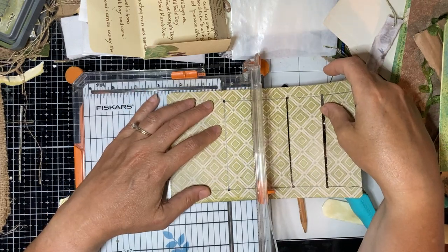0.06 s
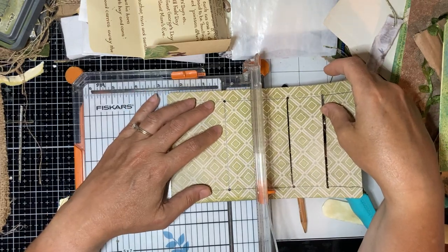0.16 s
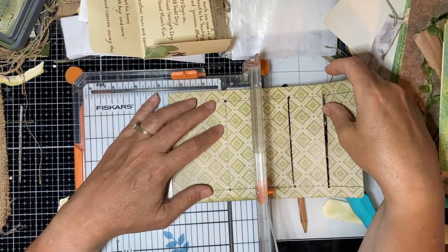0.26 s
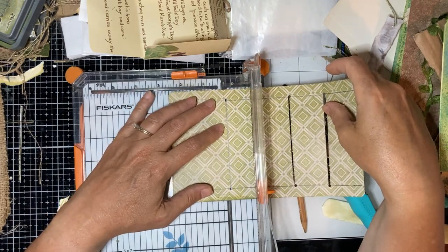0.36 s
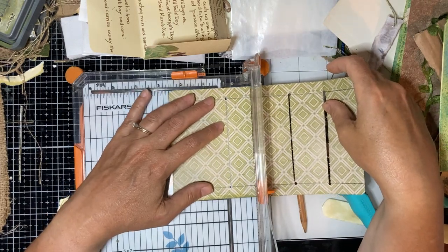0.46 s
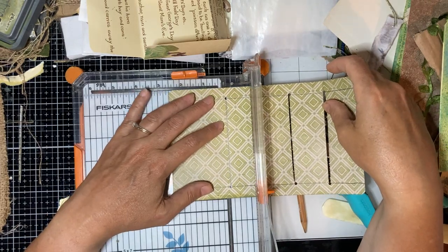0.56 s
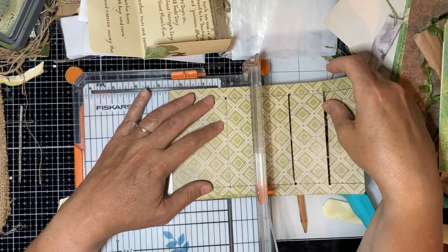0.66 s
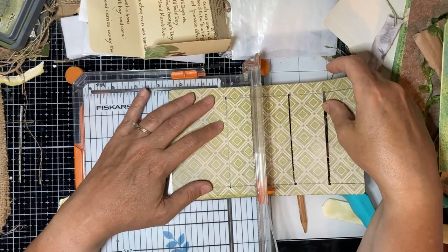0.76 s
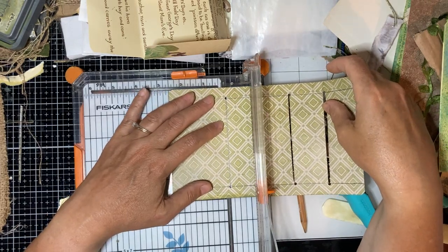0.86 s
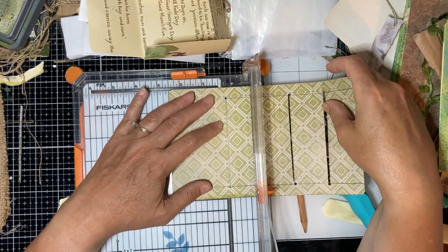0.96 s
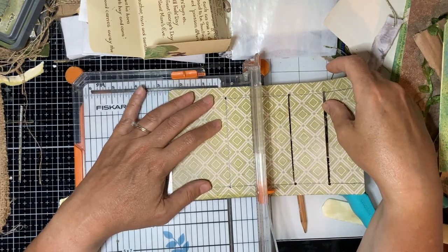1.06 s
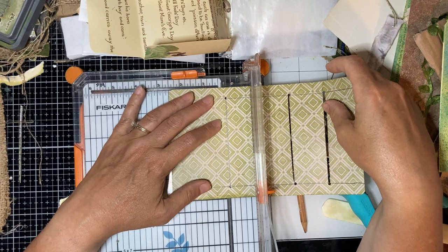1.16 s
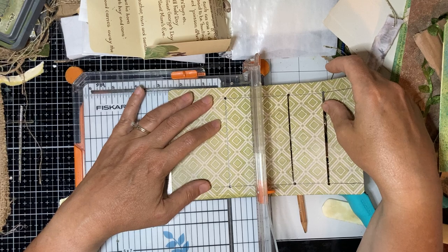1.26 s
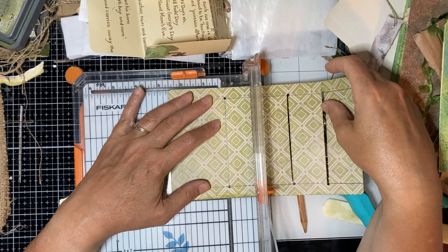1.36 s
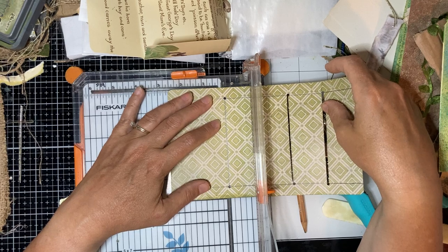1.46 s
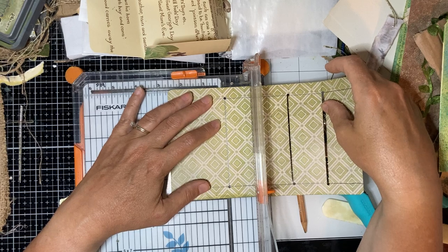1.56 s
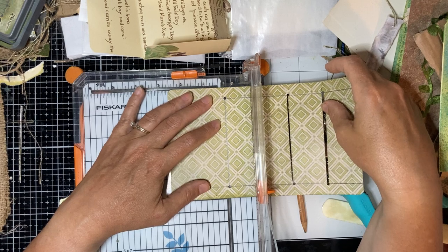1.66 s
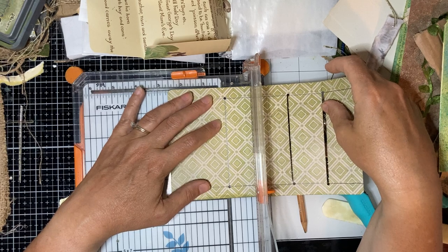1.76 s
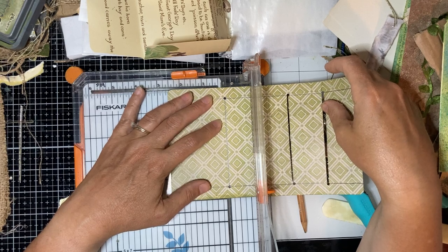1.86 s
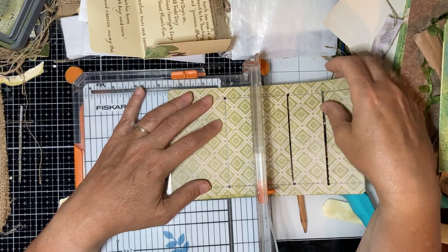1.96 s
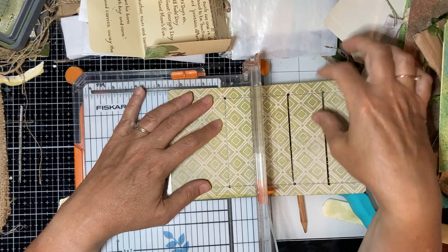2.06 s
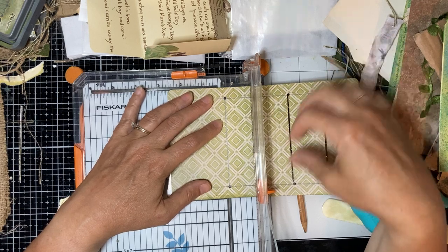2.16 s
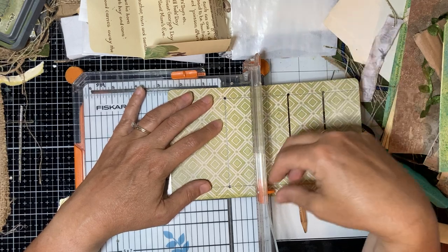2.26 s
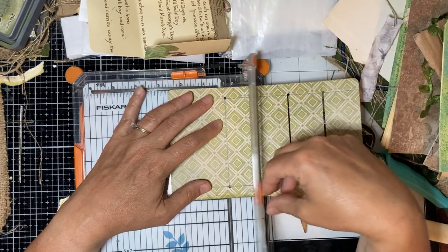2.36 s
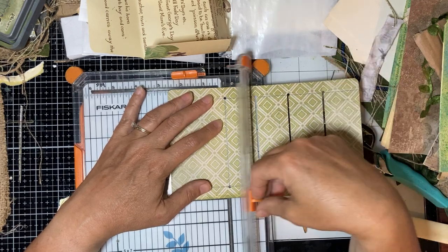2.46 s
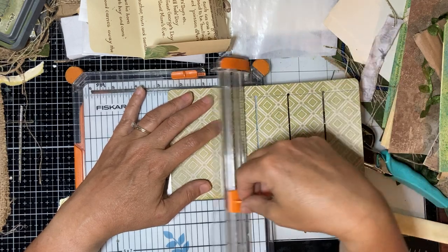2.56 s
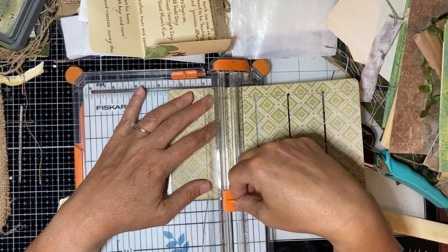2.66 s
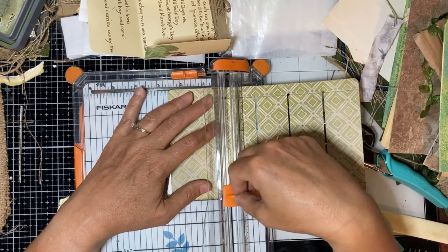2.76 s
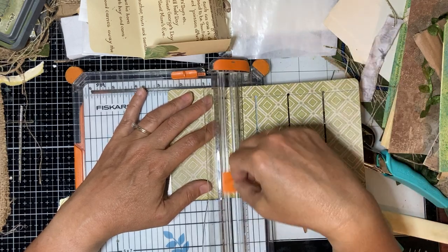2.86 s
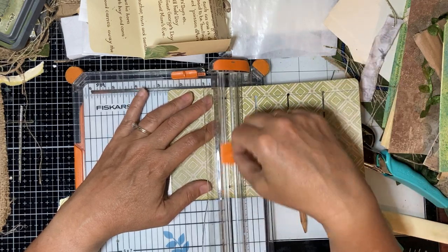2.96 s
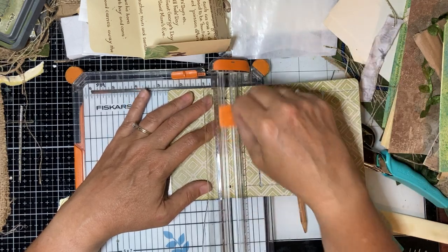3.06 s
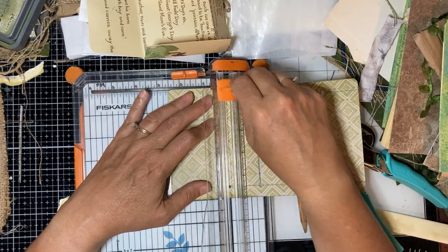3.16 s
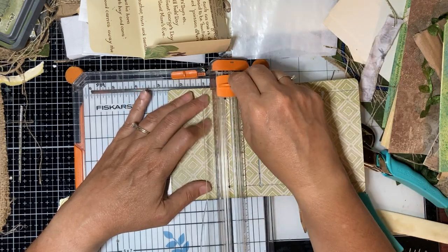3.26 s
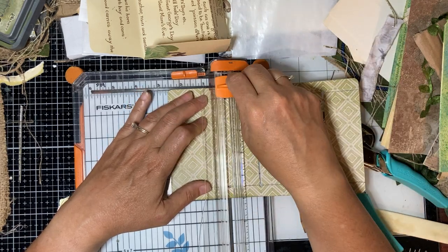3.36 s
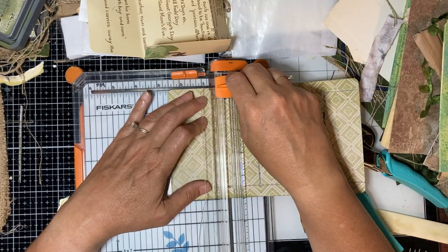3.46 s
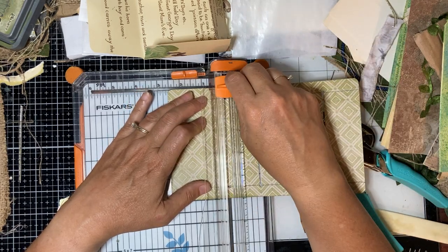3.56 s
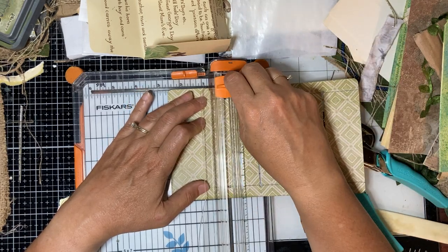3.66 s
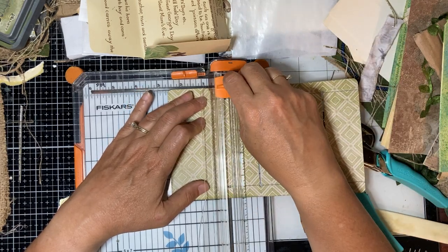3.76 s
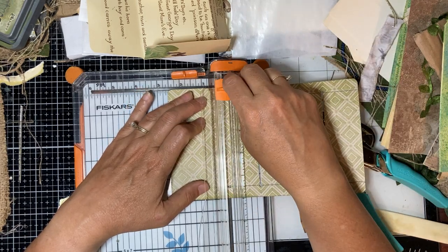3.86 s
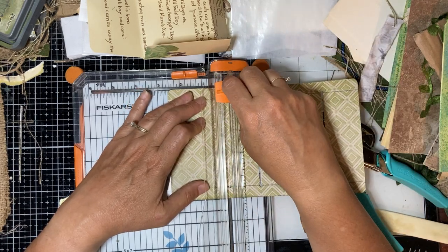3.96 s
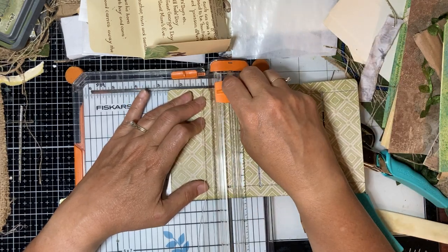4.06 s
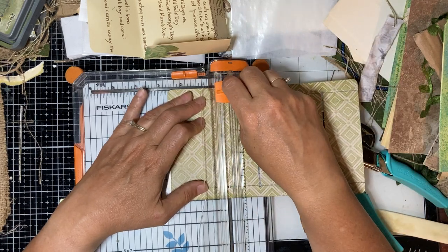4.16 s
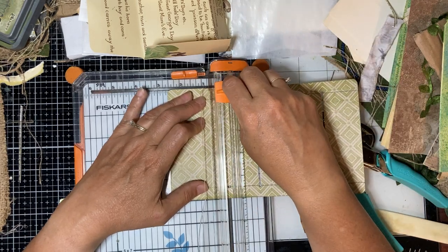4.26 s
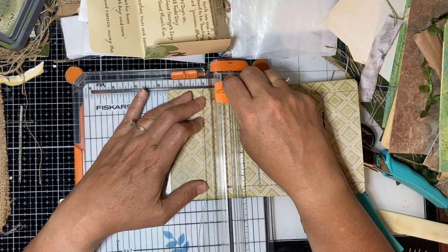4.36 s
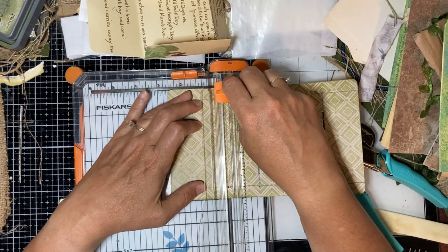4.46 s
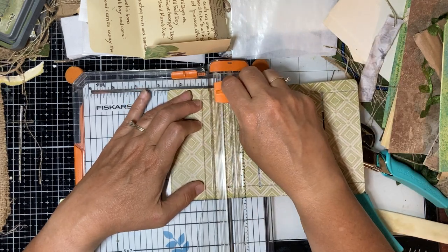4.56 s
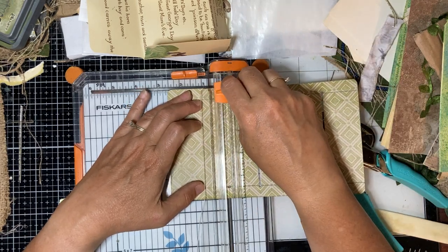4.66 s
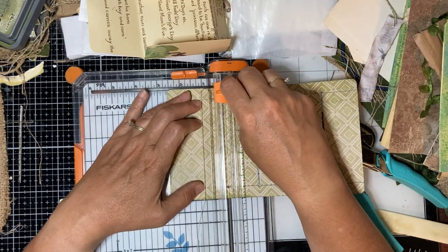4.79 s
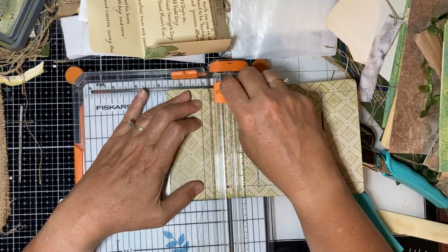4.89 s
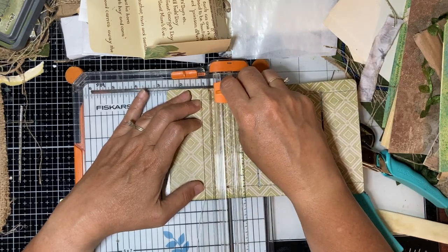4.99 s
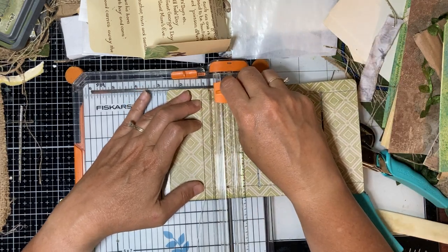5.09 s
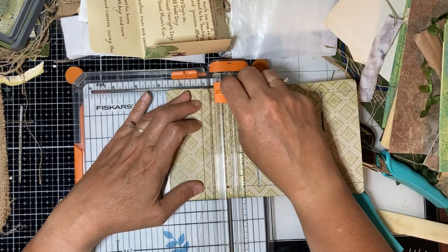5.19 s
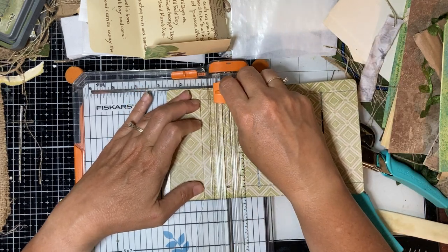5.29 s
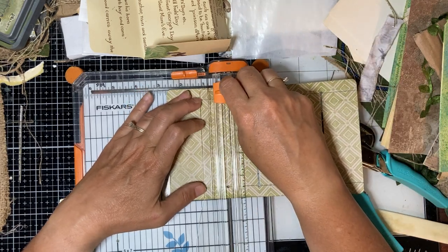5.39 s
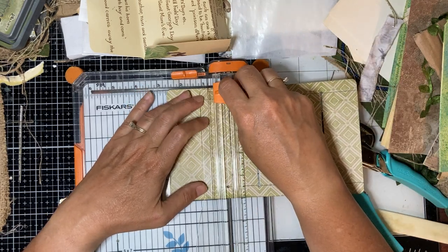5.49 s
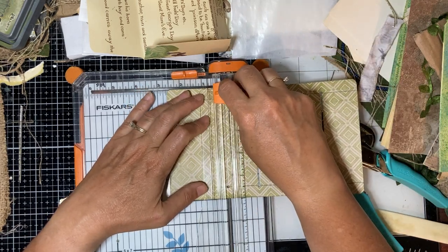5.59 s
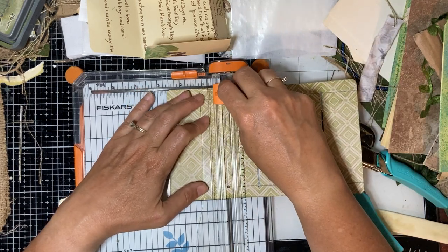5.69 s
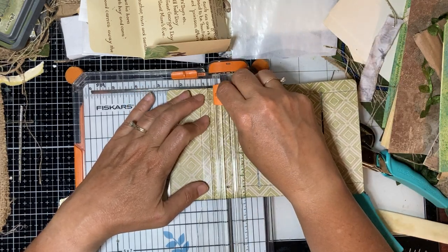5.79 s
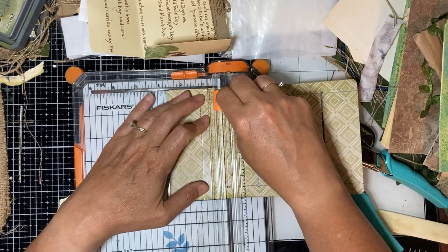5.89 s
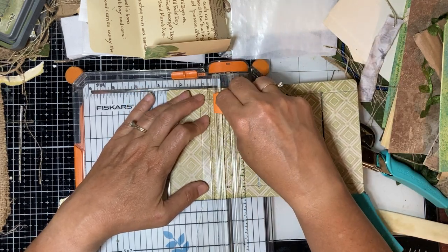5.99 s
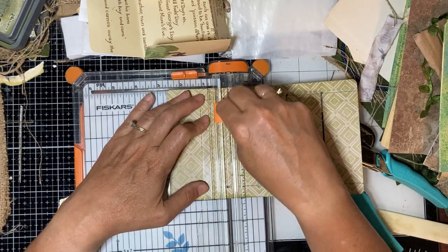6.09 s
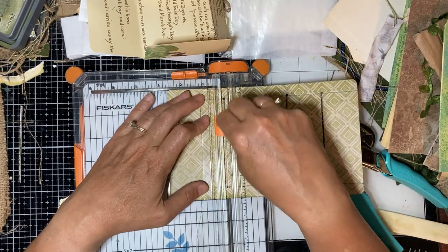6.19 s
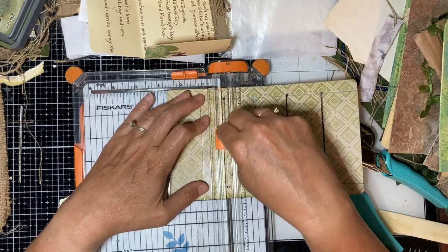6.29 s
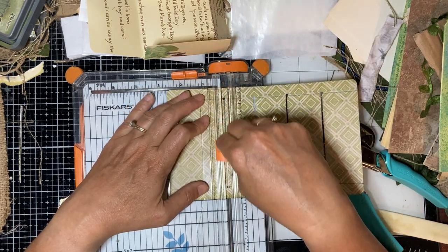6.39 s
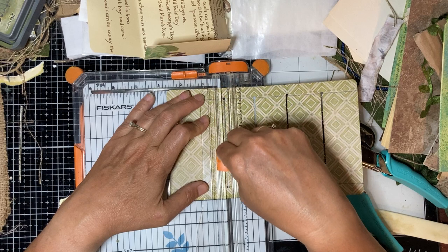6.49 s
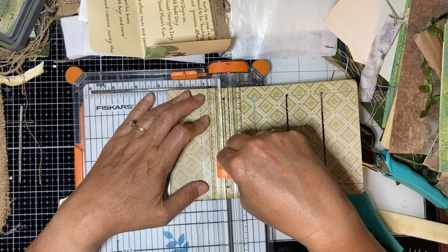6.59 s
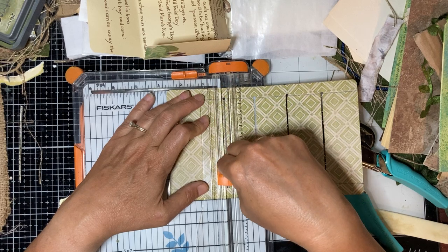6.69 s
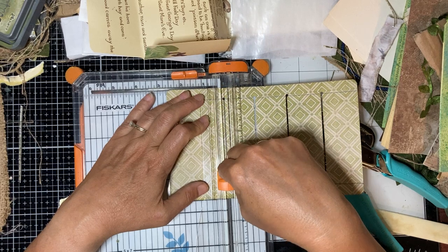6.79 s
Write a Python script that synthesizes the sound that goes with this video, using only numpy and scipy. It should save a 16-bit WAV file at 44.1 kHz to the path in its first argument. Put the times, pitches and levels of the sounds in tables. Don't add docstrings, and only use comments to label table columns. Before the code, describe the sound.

A quiet indoor desk, miked closely in stereo with a slight left lean, over low appliance hum and a faint distant motor during the first 1.5 s. From 0.4 to 1.6 s come tiny card scuffs, faint breathy skin whistles and soft taps, clearest near 0.9. Around 2.0 a short hard rub and double tap as card shifts. Hand shuffling and small clicks run 2.3-2.55, then a loud, bright plastic double clack at 2.65. From 2.85 the carriage slides, squealing in high stick-slip bursts, strongest about 3.0, with gliding wire notes, bumping to its stop near 3.3. Sparse soft taps and scuffs fill 3.6-5.4, notably 3.9, 4.4 and 5.2. Clicks and rubbing at 5.5-5.85 end in a low knock at 5.87. From 6.0 a coarse hollow scrape cuts the card, strongest near 6.25, breaking into quick snags from 6.4, easing toward a final thump at 6.79.

```python
import sys
import numpy as np
from scipy import signal
from scipy.fft import rfft, irfft, next_fast_len
from scipy.io import wavfile
from scipy.ndimage import uniform_filter1d, map_coordinates

SR = 44100
rng = np.random.default_rng(int(sys.argv[2]) if len(sys.argv) > 2 else 0)


def magnitude_from_level(level_db):
    exponent = np.asarray(level_db, float) / 20
    return 10 ** exponent


def output_pcm(signal):
    pcm = np.clip(np.atleast_2d(signal).T, -1, 1) * 32767
    wavfile.write(sys.argv[1], SR, np.round(pcm).astype(np.int16))


N = 301644
TIME = np.arange(N) / SR


def unit(x):
    return x / np.sqrt(np.mean(x ** 2) + 1e-20)


def unit_gain(response):
    return response / np.sqrt(np.mean(np.abs(response) ** 2))


def along(points, hz):
    f, v = np.transpose(points)
    return np.interp(np.log(hz + 1), np.log(f + 1), v)


def wobble(rate):
    knots = rng.standard_normal(int(N * rate / SR) + 4)
    return map_coordinates(knots, [TIME * rate])


def gate(start, length, rise, fall):
    return np.clip(np.minimum((TIME - start) / rise, (start + length - TIME) / fall + 1), 0, 1)


def filtered(x, response):
    m = next_fast_len(N + SR // 2)
    return irfft(rfft(x, m) * response(np.fft.rfftfreq(m, 1 / SR)), m)[..., :N]


def modes(table):
    def response(f):
        total = 0
        for k, (centre, width, db) in enumerate(table):
            damping = 1j * f * width
            total = total + (-1) ** k * magnitude_from_level(db) * damping / (centre * centre - f * f + damping)
        return unit_gain(total)
    return response


def colour(points):
    return lambda f: unit_gain(magnitude_from_level(along(points, f)))


# f/Hz, lead/rad
LEFT_LEAD = [(0, 0), (700, .9), (1550, -.2), (2840, 2.2), (5900, 2.6), (6800, .1), (9200, -3.14),
             (11200, -6.1), (12400, -7.7), (13400, -9.2), (16000, -12.8)]


def ports(pair, alike):
    def spread(hz):
        turn = np.arccos(np.clip(along(alike, hz), 0, 1)) / 2
        return np.array([np.cos(turn), np.sin(turn)])

    def lag(hz):
        return np.exp(np.outer([.5j, -.5j], np.interp(hz, *np.transpose(LEFT_LEAD))))

    mid, side = filtered(pair, spread)
    return filtered(np.array([mid + side, mid - side]), lag)


# f/Hz, level/dB
AIR = [(25, -40.5), (45, -3.5), (60, -0.5), (80, -7.5), (110, -10.5), (170, -14.5), (260, -25), (500, -37),
       (1000, -41.5), (2000, -47), (5000, -50), (10000, -54.5), (13000, -54.5), (15600, -70)]
# f/Hz, unsteadiness/Hz, level/dB
HUM = [(58.5, 4.045, -55.5), (103.2, 2.8, -63), (118.3, 6.9, -68.5), (241.2, 1.7, -76.5)]
# t/s, f/Hz, level/dB
DRONE = [(0, 331.3, -76.5), (.25, 336.5, -70.5), (.45, 330, -78), (.65, 332, -71.5), (.85, 337, -70),
         (1.1, 334.5, -72.5), (1.3, 328, -81.5), (1.5, 328, -99)]
# f/Hz, likeness/0..1
FAR_ALIKE = [(100, 0.93), (350, 0.68), (700, 0.38), (1500, 0.097), (6000, 0.1), (7200, 0.21), (8600, 1),
             (11400, 0.71), (13000, 0.69), (15500, 0.506)]


def room():
    air = magnitude_from_level(-57.5 + 0.4 * wobble(1.7)) * filtered(rng.standard_normal((2, N)), colour(AIR))
    hum = np.zeros(N)
    for hz, rate, db in HUM:
        level = np.sqrt(2) * magnitude_from_level(db + 2.88 * wobble(rate))
        hum += level * np.sin(2 * np.pi * hz * TIME + 1.2 * wobble(rate))
    s, hz, db = np.transpose(DRONE)
    phase = 2 * np.pi * np.cumsum(np.interp(TIME, s, hz)) / SR + 1.6 * wobble(18)
    drone = magnitude_from_level(np.interp(TIME, s, db) + 3.3 * wobble(8)) * np.sin(phase)
    return ports(air + hum * [[1], [.3]] + drone * [[1], [.5]], FAR_ALIKE)


# f/Hz, t60/s
WALLS = [(200, 0.29), (2000, 0.1), (10000, 0.11)]


def walls(x):
    hz, t, z = signal.stft(rng.standard_normal((2, SR // 2)), SR, nperseg=256)
    decay = magnitude_from_level(-60 * t / along(WALLS, hz)[:, None])
    tail = signal.istft(z * decay, SR, nperseg=256)[1]
    tail = tail / np.linalg.norm(tail[0])
    late = np.pad(x, (200, 0))
    return signal.fftconvolve(late[None], tail, axes=1)[:, :N]


# t/s, f/Hz, level/dB, t60/s
RINGS = [(3.165, 7200, -45, .03), (2.637, 1500, -44, 0.056), (2.654, 1455, -45, 0.056),
         (3.915, 900, -68.5, 0.052), (5.23, 800, -52, 0.045), (2.636, 736, -49, 0.048),
         (2.768, 1070, -57.5, 0.038), (2.873, 1220, -54, 0.037), (3.144, 1730, -41, 0.03),
         (3.316, 2240, -44.5, 0.03), (3.333, 618, -49, 0.055), (3.262, 2100, -62.5, .1),
         (5.262, 780, -62, 0.053), (2.65, 823, -46, 0.051), (.428, 687, -67, 0.054),
         (.553, 703, -66, 0.081), (.89, 700, -57, 0.058), (1.013, 1190, -67, 0.048),
         (1.99, 840, -52.5, 0.032), (2.026, 950, -54, 0.027), (2.346, 1085, -51, 0.05),
         (2.51, 2100, -52, 0.1), (2.511, 2820, -43.5, 0.06), (2.522, 1090, -62, 0.035),
         (2.652, 4110, -33, 0.079), (2.7, 4020, -60, 0.095), (5.779, 4130, -51, .04),
         (5.868, 3370, -54, .04), (5.87, 1510, -43, 0.039), (0.064, 1260, -68, 0.054),
         (.905, 668, -59, 0.085), (1.036, 1910, -60.5, 0.042), (1.56, 980, -65, 0.044),
         (1.701, 980, -70, 0.07), (1.995, 1770, -41, 0.031), (2.014, 1786, -39, 0.03),
         (2.0, 293, -57.5, 0.15), (2.638, 1048, -41, 0.078), (2.636, 125, -36, 0.072),
         (2.667, 109, -39, 0.063), (3.12, 198, -46, 0.091), (3.341, 196, -50, 0.092),
         (5.229, 468, -48, 0.076), (5.29, 190, -46.5, 0.17), (5.686, 3620, -49, 0.027),
         (5.705, 3610, -48, .025), (5.72, 3620, -48, 0.027), (5.872, 327, -37.5, 0.07),
         (5.873, 145, -37, 0.075), (6.787, 109, -33, 0.037),
         (2.652, 7000, -37, .025), (2.668, 8100, -43, .025), (2.668, 10300, -50, .02),
         (2.702, 8050, -44, .03), (2.702, 10200, -45, 0.022), (2.516, 7900, -47, .025),
         (2.516, 10200, -46, .02), (2.535, 7900, -55, .03), (3.258, 620, -54, 0.047),
         (5.605, 700, -65, .09), (5.29, 450, -50.5, .07), (5.292, 790, -53, 0.055), (4.42, 900, -56, .06),
         (2.955, 2850, -55, 0.059)]


def thumps():
    out, t = np.zeros(N + SR), np.arange(SR // 2) / SR
    for s, hz, db, t60 in RINGS:
        ring = magnitude_from_level(db - 60 * t / t60) * np.sin(2 * np.pi * hz * t)
        out[round(s * SR):][:len(t)] += ring * (1 - np.exp(-t / 0.001))
    return out[:N]


# t/s, length/s, level/dB
CHIRPS = [(0.463, 0.028, -74), (0.598, 0.022, -70), (0.832, 0.03, -73), (.941, 0.017, -68.5),
          (.97, 0.029, -79), (2.366, 0.056, -84), (3.841, 0.061, -88)]
# f/Hz, width/Hz, level/dB
SKIN = [(7540, 660, -0.5), (9300, 620, -1.5), (11600, 700, 0), (15000, 740, 0.5)]


def fingers():
    force = sum(magnitude_from_level(db) * gate(s, length, 0.0018, 0.018) for s, length, db in CHIRPS)
    return filtered(force * rng.standard_normal((2, N)), modes(SKIN))


def tone(rows, rough_db, drift):
    s, hz, db, octave_db = np.transpose(rows)
    t = TIME[(TIME >= s[0]) & (TIME < s[-1])]
    knots = np.linspace(0, 1, num=250)
    sway, *shakes = (np.interp((t + .5) % 1, knots, k) for k in rng.standard_normal((3, 250)))
    phase = 2 * np.pi * np.cumsum(np.interp(t, s, hz)) / SR + drift * sway
    level = magnitude_from_level([np.interp(t, s, v) + rough_db * shake for v, shake in zip((db, octave_db), shakes)])
    out = np.zeros(N)
    out[round(t[0] * SR):][:len(t)] = np.sqrt(2) * (level[0] * np.sin(phase) + level[1] * np.sin(2 * phase))
    return out


# t/s, length/s, level/dB, octave re level/dB
SQUEAL = [(2.845, .365, -67, -18), (2.874, .32, -60.5, -18.5), (2.885, 0.023, -49, -21),
          (2.905, 0.016, -50, -22), (2.925, 0.011, -55, -20.5), (2.95, 0.015, -45.5, -22),
          (2.964, 0.013, -43, -19.5), (2.975, .02, -33, -10.5), (2.98, .0165, -34, 12.5),
          (2.998, 0.011, -38.5, 9.5), (3.009, .013, -34, 6.5), (3.016, 0.018, -28.5, -13.5),
          (3.036, .014, -34, -15), (3.075, 0.043, -53, -21), (3.122, 0.024, -41, -30),
          (3.15, .025, -58, -25)]
BURST_HZ = [6170, 6150, 6215, 6150, 6190, 6130, 6205, 6200, 6190, 6235, 6170, 6095, 6135, 6125, 6140, 6125]


def squeal():
    bursts = []
    for s, length, db, octave_db in SQUEAL:
        swell = gate(s, length, 0.01, 0.0099) ** 2
        bursts.append(magnitude_from_level([[db], [db + octave_db]]) * swell)
    power = np.array([np.sum(burst ** 2, axis=0) for burst in bursts]) + 1e-30
    pitch = BURST_HZ @ power / power.sum(0)
    level = sum(bursts)
    rows = np.c_[TIME, pitch, 20 * np.log10(level.T + 1e-6)]
    rasp = magnitude_from_level(-7) * filtered(level[0] * rng.standard_normal(N), modes([(6050, 150, 0)]))
    sounding = level[0].nonzero()[0]
    return rasp + tone(rows[sounding[0]:sounding[-1]], rough_db=1.2, drift=.3)


# t/s, length/s, from f/Hz, to f/Hz, peak level/dB
BRIEF = [(3.012, .016, 15400, 17000, -47), (3.031, .017, 14600, 15800, -42),
         (3.052, .016, 11200, 12100, -51.5), (3.092, .016, 10200, 11000, -54),
         (2.908, .018, 6600, 6000, -52), (3.11, 0.023, 9100, 10600, -43.5),
         (3.04, 0.011, 9700, 10500, -36.5), (3.062, 0.075, 7500, 7500, -58.5)]
# t/s, f/Hz, level/dB
AHEAD = [(2.992, 6196, -52), (3.002, 6340, -34.5), (3.012, 6640, -33.5), (3.025, 6870, -39),
         (3.035, 7600, -45.5), (3.045, 8200, -32), (3.058, 9300, -50.5), (3.075, 9900, -78.5)]
# t/s, f/Hz, level/dB
CLIMB = [(2.995, 12480, -45), (3.002, 12760, -23), (3.007, 13050, -31), (3.012, 13290, -28),
         (3.017, 13500, -37), (3.027, 14100, -42), (3.036, 14900, -48)]
# t/s, f/Hz, level/dB
BEHIND = [(3.05, 8500, -67), (3.06, 8700, -48), (3.08, 8550, -48), (3.11, 8100, -68), (3.17, 7620, -62),
          (3.22, 7375, -67.5), (3.3, 7365, -73), (3.33, 7360, -78), (3.5, 7350, -100)]
# pitch ratio/1, level/dB
OVERTONES = [(20 / 21, -4), (1, 0), (23 / 21, -1)]


def wire():
    gliding = [AHEAD, CLIMB]
    for s, length, from_hz, to_hz, db in BRIEF:
        shape = ((0, -17), (.35, 0), (1, -21))
        gliding.append([(s + u * length, from_hz + u * (to_hz - from_hz), db + down_db) for u, down_db in shape])
    settling = []
    for k, (ratio, step_db) in enumerate(OVERTONES):
        settling.append([(s + k * 1e-3, hz * ratio, db + step_db) for s, hz, db in BEHIND])
    out = squeal()
    for notes, rough_db, drift in ((gliding, 3.5, .5), (settling, 2.0, .15)):
        for rows in notes:
            no_octave = [(*row, -120) for row in rows]
            out = out + tone(no_octave, rough_db, drift)
    return out


# t/s, length/s, force level/dB, weight into the base/dB, edge sharpness/dB
SCUFFS = [(0.41, 0.037, -78.5, 0, 5.5), (0.449, 0.041, -81, 2, 9.5), (1.025, 0.023, -83, 14, 6.5),
          (1.55, 0.038, -91, 4, -11), (0.189, .05, -86, 4, 0), (3.592, 0.11, -82.5, 4, -2),
          (3.84, 0.05, -79.5, -6.5, -4), (3.893, 0.083, -84.5, 2, 1.5), (4.048, 0.089, -84.5, 12, -5),
          (4.177, 0.025, -89, 14.5, -5), (4.419, 0.057, -75.5, 7.5, 1), (4.537, 0.046, -86, 16, 1),
          (4.803, 0.047, -82.5, 10, -8.5), (5.097, 0.039, -84, 0, -3.5), (5.221, 0.0483, -66.5, 7.5, -1.5),
          (5.283, 0.019, -80, 31, -1)]
# t/s, level/dB, lightness/dB
PULL = [
    (1.9, -94, 2),
    (1.95, -78, 9.5),
    (1.998, -52, -3),
    (2.03, -64.5, -4),
    (2.11, -101, -16),
]
# t/s, level/dB, lightness/dB
SHUFFLE = [(2.33, -77, -7), (2.345, -71, -10.5), (2.4, -79.5, -7.5), (2.49, -71, 5), (2.554, -76, 7.5),
           (2.63, -79, 13)]
# t/s, level/dB, lightness/dB
GLIDE = [(2.72, -78, -1.5), (2.84, -73.5, 1), (2.88, -64, 0), (2.96, -62.5, 0), (3.03, -57.5, 9),
         (3.075, -62, 10), (3.15, -60, 5), (3.21, -66, -6), (3.312, -75.5, 1.5)]
# t/s, level/dB, lightness/dB
ARRIVE = [
    (3.31, -60, 0),
    (3.318, -57.5, -0.25),
    (3.35, -64, 1.6),
    (3.375, -77.5, -0.17),
    (3.46, -86, -2),
]
# t/s, level/dB, lightness/dB
NUDGE = [(5.47, -91.5, 2.5), (5.54, -73, 4.5), (5.668, -75, -7.5), (5.686, -71, 4), (5.81, -75.5, -5),
         (5.84, -60, 3.5), (5.866, -54, -1), (5.92, -61, 2.5), (6.0, -62.5, 2)]
# t/s, level/dB, lightness/dB
CUT = [(6.0, -63, 4), (6.06, -53, 0), (6.12, -49.5, -0.5), (6.24, -47.5, 0), (6.33, -49.5, -1.5),
       (6.42, -49.5, 1), (6.55, -53, -2.5), (6.68, -54.5, 2.5), (6.84, -58, 0)]
LIGHTNESS = (-0.66, 0.11, 0.032, 0.83)


def slides(grit_db, stutter_db):
    grit = unit(magnitude_from_level(grit_db * wobble(900) + stutter_db * wobble(70) + 0.23 * wobble(44)))
    force = np.zeros((4, N))
    for s, length, db, weight_db, sharp_db in SCUFFS:
        parts = magnitude_from_level(db + np.array([weight_db, 0, 0.5, sharp_db]))
        force += gate(s, length, 0.0027, 0.014) * parts[:, None]
    # stroke, then base, rail and edge in dB re deck
    strokes = [(PULL, -13, -2.4, 1.45), (SHUFFLE, 5.7, -3.2, -2.5), (GLIDE, 0, 1.2, 4.1),
               (ARRIVE, 2.4, 2.9, -8.5), (NUDGE, -0.42, -2, -0.83), (CUT, 0, -3.5, -1.8)]
    for rows, base_db, rail_db, edge_db in strokes:
        s, db, light_db = np.transpose(rows)
        levels = db + np.c_[[base_db, 0, rail_db, edge_db]] + np.outer(LIGHTNESS, light_db)
        stroke = gate(s[0], s[-1] - s[0], 0.0067, 0.011)
        force += stroke * magnitude_from_level([np.interp(TIME, s, v) for v in levels])
    return force * grit


# t/s, force level/dB, weight into the base/dB, sharpness/dB
TOUCHES = [(.5516, -71, 9, -11), (.8857, -70, -1, -16), (.9028, -54, 3, -16.5), (1.0011, -65, 1, -18),
           (1.0318, -73, -4, -33), (1.8736, -72.5, 12, -14), (1.9944, -46.5, -28, -13.5),
           (2.0154, -47, -24, -12.5), (2.0274, -59.5, -5, -12), (2.1301, -60.5, 10.5, -13.5),
           (3.6062, -53, -18, -26.5), (3.67, -78, 8, -3.5), (3.914, -67.5, 4, -24), (3.9579, -71, 3.5, -25),
           (4.0213, -70.5, -7, -2), (4.1001, -63.5, -7, -26), (4.1495, -71, 11, -14.5),
           (4.1899, -66, 2.5, -24.5), (4.366, -71, 6.5, -14), (4.4174, -52, 2.5, -22.5),
           (4.8464, -65, -14, -18), (5.2144, -64.5, 6, -5.5), (5.2285, -62.5, 3, -10),
           (5.2525, -62.5, -3, 4.5), (5.3697, -65.5, 4.5, -10.5)]
# t/s, force level/dB, weight into the base/dB,
# sharpness/dB
CLICKS = [(2.3424, -51, -10, -17), (2.4294, -57.5, 1.5, -15), (2.5084, -52, -17, 0), (2.5174, -58, -11, -8),
          (2.5344, -58, -7, 7.5), (2.6349, -33.5, -6, -2.5), (2.6514, -32.5, -8, -5.5),
          (2.6674, -49.5, -23, 2), (2.6908, -44, -25, -9), (2.7014, -51.5, -23, 3.5),
          (2.7674, -63, 1, -6.5), (3.0904, -43.5, -6.5, -25), (3.1318, -50, -27, -26),
          (3.1674, -53, -30, -3), (3.2534, -57, 5, -8.5), (3.3144, -57.5, -18, -6.5),
          (3.3304, -53.5, -7, -5.5), (5.4874, -63, 3, -5), (5.5318, -57, -3.5, 2),
          (5.6835, -53.5, -17, -13), (5.7034, -65, -23, -13), (5.7179, -51.5, -9, -12),
          (5.7773, -59, 5.5, -16), (5.8691, -45, -23, -12),
          (2.874, -53.5, -20, -22), (2.985, -56.5, -9, -20), (3.035, -55, 0, -21), (3.05, -58, 1, -26.5),
         (3.142, -50.5, -31, -22.5), (3.155, -58.5, -5, -19.5), (2.931, -62, -8, -19),
         (3.104, -56.5, 3, -19.5), (3.208, -63.5, 4, -20.5), (2.375, -75, 8, -23), (2.448, -84, 21, -16),
         (2.466, -66.5, 7, -20), (2.563, -66, -21, -1.5), (2.627, -60, -21, 0), (2.057, -63, -10, -20),
         (5.692, -59, -5, -21), (5.785, -68, -8, -20), (5.822, -54, -19, -6), (5.842, -54, -18, -11.5),
         (5.742, -56, -3, -16), (5.747, -61, 1.5, -20), (5.888, -73, -12, -23.5)]
# t/s, force level/dB
SNAGS = [(6.047, -52), (6.063, -42), (6.183, -39.5), (6.229, -39), (6.243, -35), (6.31, -45.5),
         (6.3674, -56.5), (6.664, -43), (6.676, -52), (6.4114, -32.5), (6.4539, -34.5), (6.4747, -37.5),
         (6.4902, -35.5), (6.5125, -31.5), (6.5572, -31.5), (6.5942, -31.5), (6.644, -35), (6.723, -39),
         (6.7797, -30.5)]


def taps():
    force, blows, t = np.zeros((4, N + SR)), np.zeros((4, N)), np.arange(SR // 10) / SR
    rise_s = 0.0007
    snags = [(s, db, -8, -14.5) for s, db in SNAGS]
    # contacts, card edge dB, clean blow re the rattle dB, t60 s
    kinds = [(TOUCHES, 1, 14, 0.042), (CLICKS, -5.5, 10, 0.042), (snags, -9.5, 10.5, 0.013)]
    for table, edge_db, blow_db, t60 in kinds:
        fall = -60 * t / t60
        for s, db, weight_db, sharp_db in table:
            base = weight_db + 0.82 * fall
            deck = fall - 4.0
            rail = sharp_db + 5.0 + 1.09 * fall
            edge = sharp_db + edge_db + 10.5 + 2.1 * fall
            levels = np.array([base, deck, rail, edge])
            start = round(s * SR)
            force[:, start:start + len(t)] += magnitude_from_level(db + levels) * (1 - np.exp(-t / rise_s))
            blows[:3, round((s + rise_s) * SR)] += magnitude_from_level(db + blow_db + levels[:3, 0])
    return force[:, :N], blows


def patchy(patchy_db):
    z = signal.stft(rng.standard_normal((2, N)), nperseg=512)[2]
    field = uniform_filter1d(rng.standard_normal(z.shape[1:]), size=5, axis=0)
    field = uniform_filter1d(field, size=8, axis=1)
    return unit(signal.istft(z * magnitude_from_level(patchy_db * unit(field)), nperseg=512)[1][:, :N])


# f/Hz, width/Hz, level/dB
BASE = [(201, 60, -2.5), (340, 76, -4.5), (600, 160, -1.5), (824, 263, -8)]
# f/Hz, width/Hz, level/dB
CUT_BASE = [(123, 70, -5.5), (185, 70, -5.5), (246, 60, -3.5), (361, 61, -2), (482, 71, -2.5),
            (587, 55, 2.5), (720, 130, -16)]
# f/Hz, width/Hz, level/dB
DECK = [(1130, 130, -2.5), (1560, 56, -3), (1710, 90, -7.5), (2088, 170, -5), (2342, 101, -5),
        (2736, 310, -6)]
# f/Hz, width/Hz, level/dB
LIFTED = [(885, 190, -11), (1250, 100, -5.5), (1770, 130, 0), (2190, 150, -3.5), (2580, 130, -3),
          (3120, 140, -4.5)]
# f/Hz, width/Hz, level/dB
RUNNING = [(903.6, 130, 1), (1110, 220, -1.5), (1410, 200, -2.5), (1660, 220, -4), (2100, 310, -2.5),
           (2848, 430, -2)]
# f/Hz, width/Hz, level/dB
PINCHED = [(1144, 87, -5.5), (1500, 65, -3), (1910, 125, 0), (2370, 120, -6), (2780, 240, -12)]
# f/Hz, width/Hz, level/dB
FAR_END = [(1090, 76, 1), (1344, 25, -1), (1510, 77, -2), (1930, 130, -1), (2390, 110, -4), (2755, 120, -3),
           (904, 70, -5.5), (522, 24, 0.5)]
# f/Hz, width/Hz, level/dB
NEAR_END = [(900, 220, -11), (1220, 126, -4), (1754, 91, 1), (1974, 120, 1), (2870, 226, -8)]
# f/Hz, width/Hz, level/dB
RAIL = [(3450, 410, 0.5), (4200, 470, 0), (4800, 240, -2.5), (5460, 210, -2)]
# f/Hz, width/Hz, level/dB
HELD_RAIL = [(3210, 264, -3), (3760, 94, 5.5), (4200, 150, 1.5), (5270, 136, 5.5), (5540, 140, -4.5)]
# f/Hz, width/Hz, level/dB
CUT_RAIL = [(3405, 270, 0), (3833, 106, -2), (4080, 210, -4), (4790, 240, -1), (5260, 110, -7.5)]
# f/Hz, level/dB
EDGE = [(3500, -23), (6000, -2), (7000, -6), (8600, -2), (11400, -3), (13000, -9.5), (14500, -8.5),
        (15600, -14)]


def trimmer(force, blows):
    base, deck, rail, edge = force[:, None] * patchy(patchy_db=2.06) + blows[:, None]
    spans_s = (1.9, 2.12), (2.8, 3.3), (5.672, 6.0)
    lifted, running, pinched = [(TIME > a) & (TIME <= b) for a, b in spans_s]
    pressed = TIME > 6.0
    crossed = np.clip((TIME - 6.33) / 0.086, 0, 1)
    free = ~(lifted | running | pinched | pressed)
    pushes = [(base * ~pressed, BASE), (base * pressed, CUT_BASE),
              (deck * free, DECK), (deck * lifted, LIFTED), (deck * running, RUNNING), (deck * pinched, PINCHED),
              (deck * pressed * np.sqrt(1 - crossed), FAR_END), (deck * np.sqrt(crossed), NEAR_END),
              (rail * ~(pinched | pressed), RAIL), (rail * pinched, HELD_RAIL), (rail * pressed, CUT_RAIL)]
    body = sum(filtered(push, modes(part)) for push, part in pushes)
    return body + filtered(edge, colour(EDGE))


# f/Hz, likeness/0..1
NEAR_ALIKE = [(100, 1), (600, 0.93), (1500, 0.92), (3000, 0.64), (6000, 0.11), (7200, .75), (9000, 1),
              (11400, 0.57), (13000, 0.86), (15500, 0.86)]
# f/Hz, level/dB
LEAN = [(200, -1.5), (700, 5), (1300, 1.5), (4400, 2), (8000, 0)]


def scene():
    rattle, blows = taps()
    rub = trimmer(slides(grit_db=1.5, stutter_db=1.5) + rattle, blows)
    rub = rub + fingers() + thumps() * [[1], [.4]]
    near = ports(rub, NEAR_ALIKE) + ports(wire() * [[1], [0]], [(100, 0.93)])
    near = filtered(near, lambda hz: magnitude_from_level(np.outer([.5, -.5], along(LEAN, hz))))
    return near + magnitude_from_level(-13) * ports(walls(near.mean(0)), FAR_ALIKE) + room()


def top_cut(x):
    return signal.sosfilt(signal.butter(12, 16450, fs=SR, output="sos"), x)


def record(dry):
    mix = filtered(dry, lambda hz: hz < 15850)
    return top_cut(mix)


dry = scene()
out = record(dry)
output_pcm(out)
```